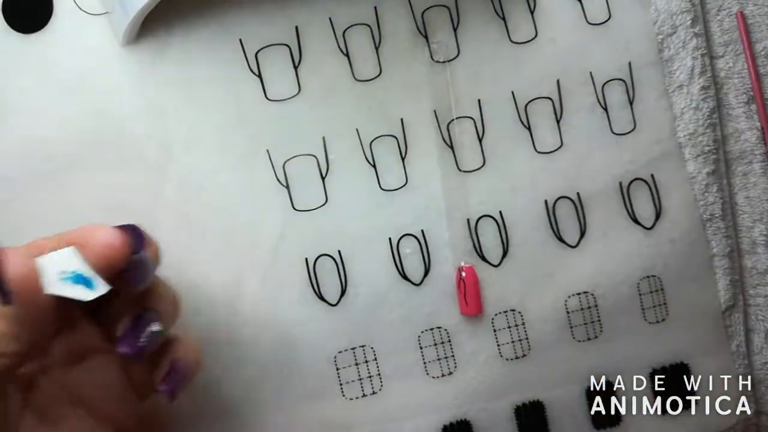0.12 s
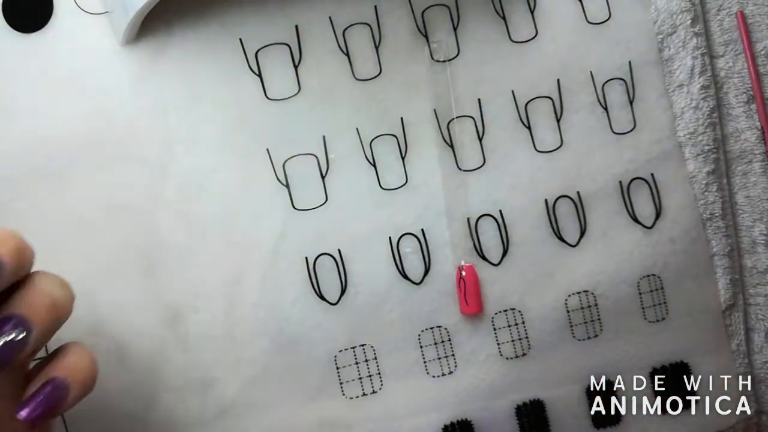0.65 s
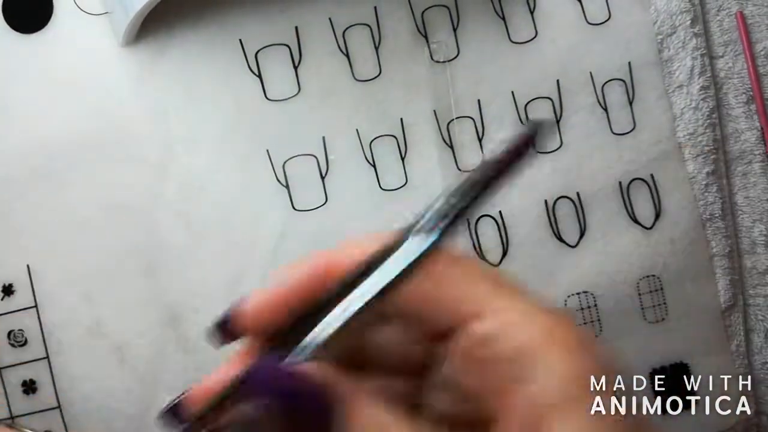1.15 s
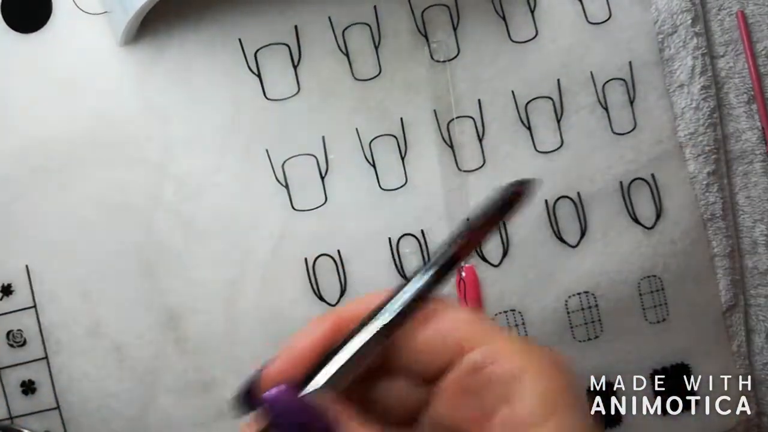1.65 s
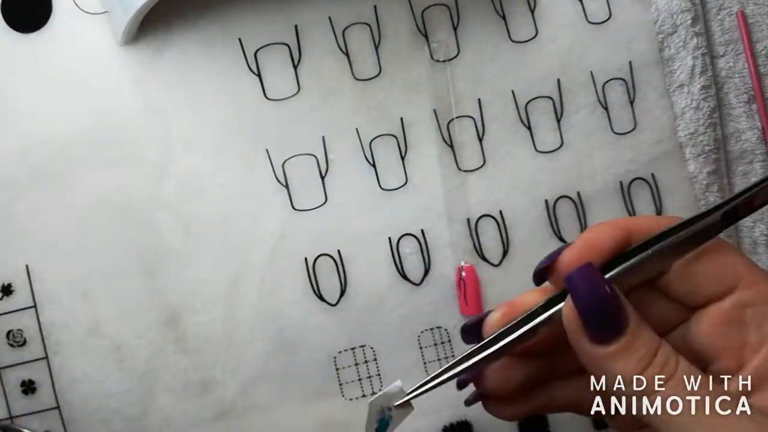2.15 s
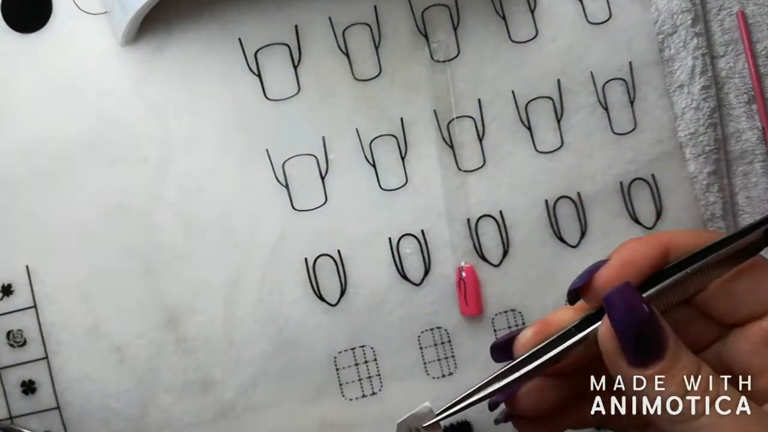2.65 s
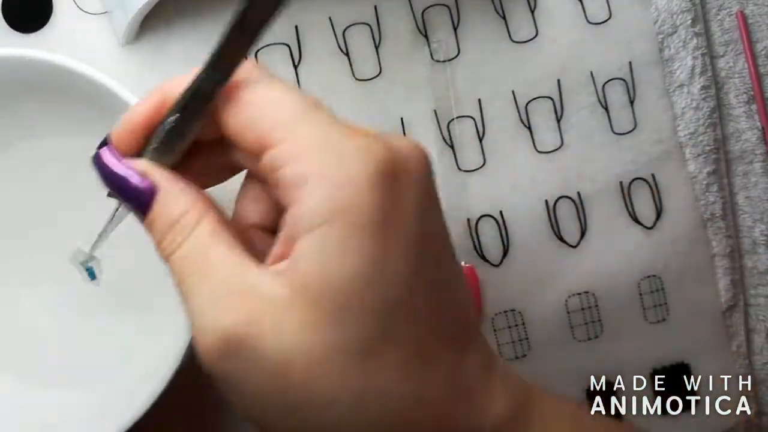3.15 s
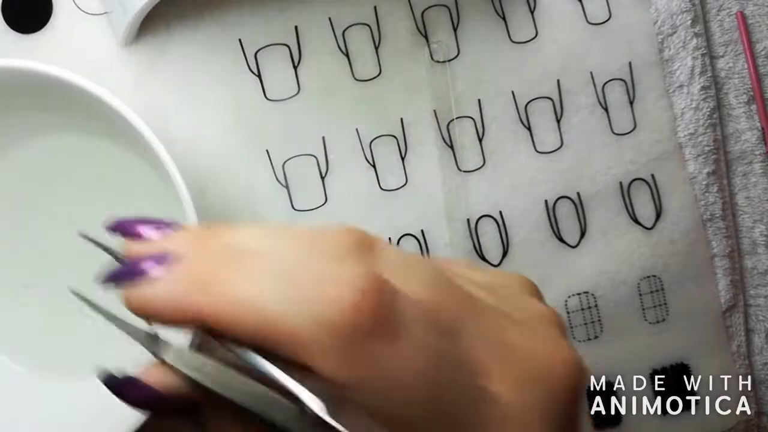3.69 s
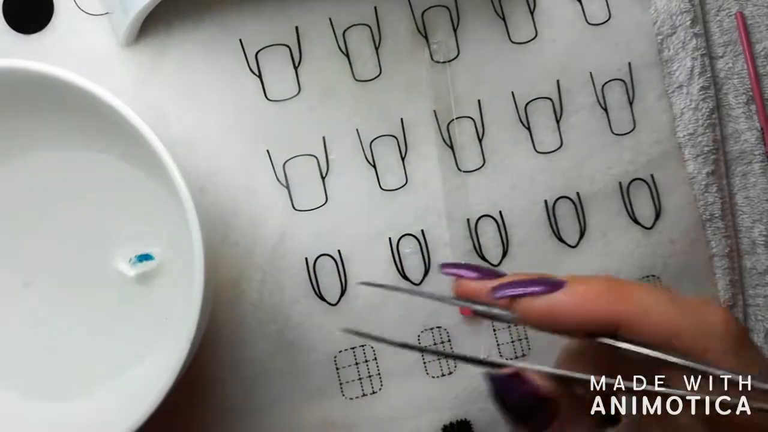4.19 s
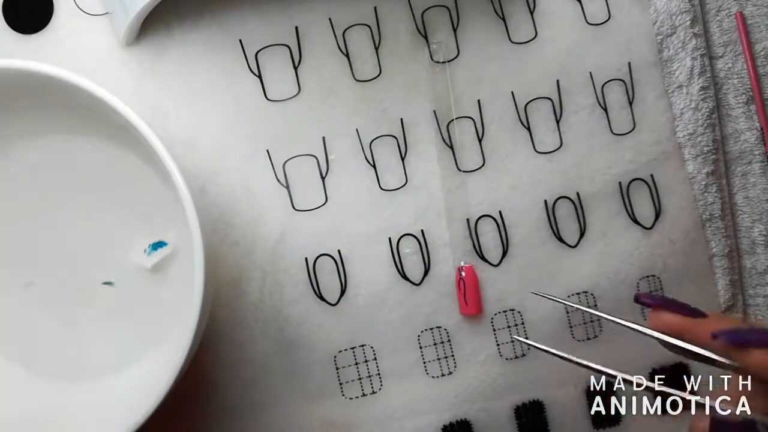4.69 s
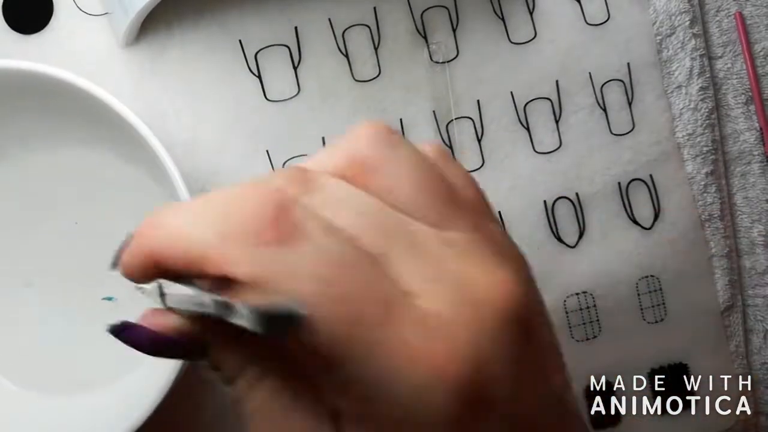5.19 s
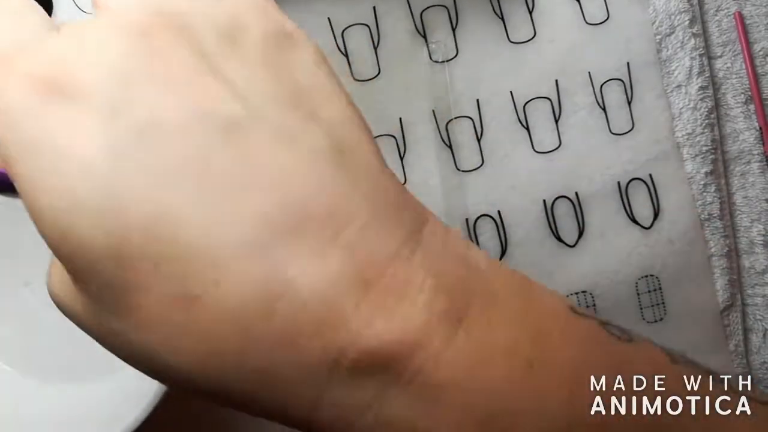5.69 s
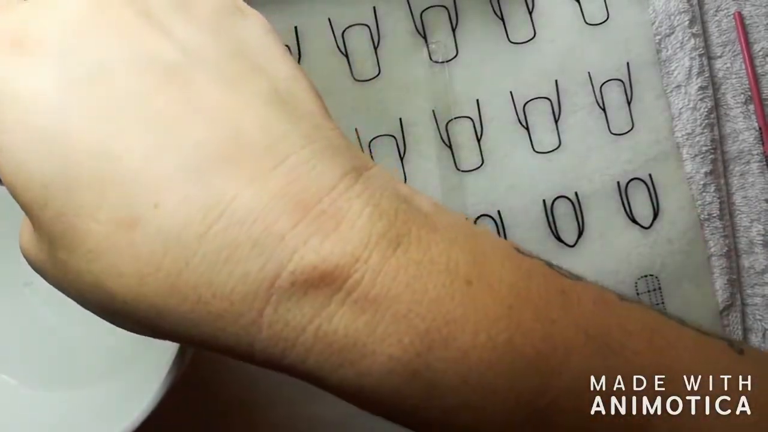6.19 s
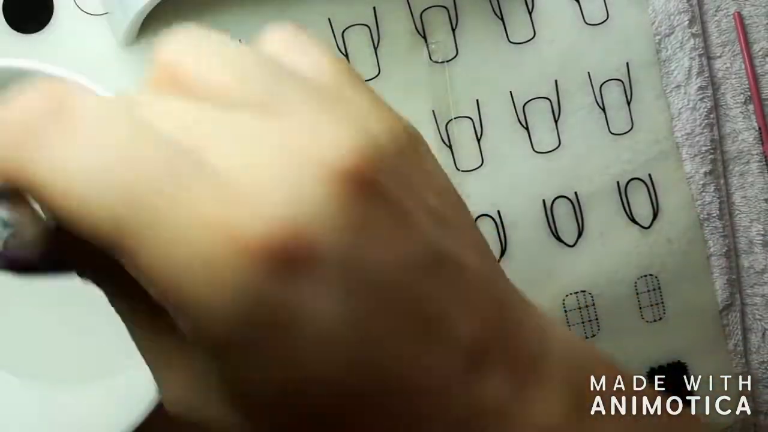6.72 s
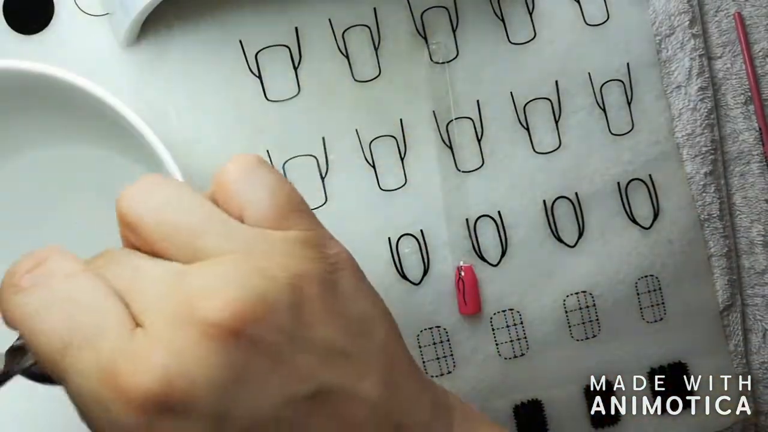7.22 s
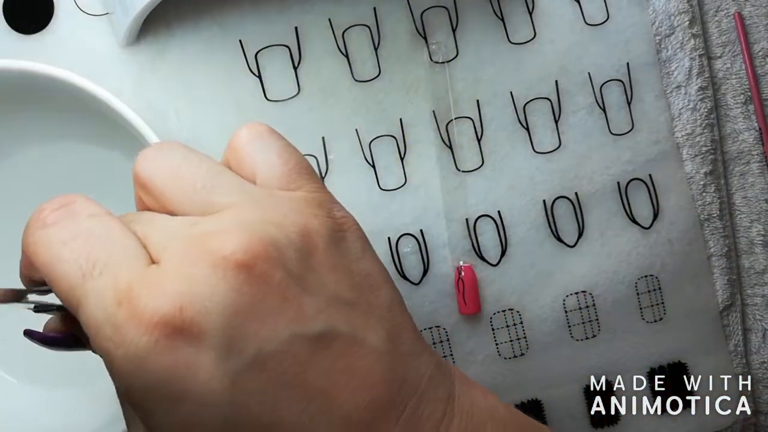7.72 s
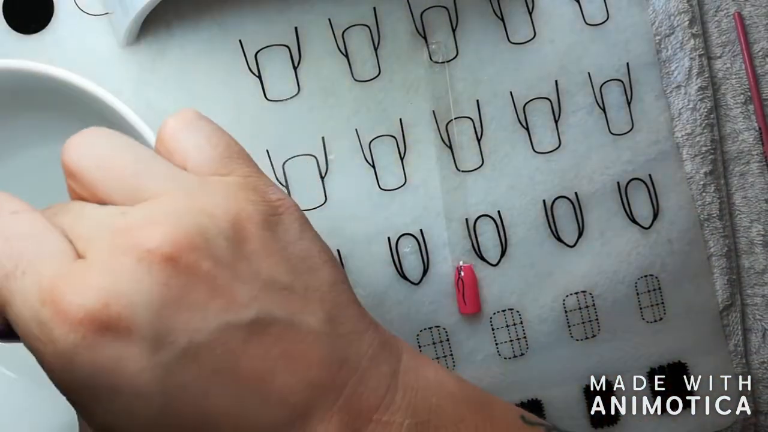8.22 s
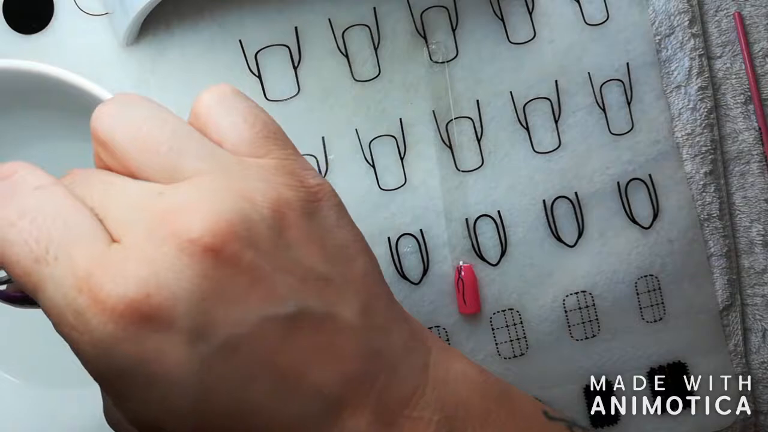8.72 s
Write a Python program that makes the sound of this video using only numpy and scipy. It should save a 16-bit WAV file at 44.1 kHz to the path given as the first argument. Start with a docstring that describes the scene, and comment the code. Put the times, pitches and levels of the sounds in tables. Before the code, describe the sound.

Close at a quiet desk, soft hand rubbing and humming room tone, a sharp steel click midway, later a muffled double-bump knock and light taps.

```python
"""Steel tweezers snap shut once and a knuckle knocks a bowl on a desk, heard from close by.
Each blow is a short push plus a noise rattle, ringing decaying sine modes; a short noise tail follows.
Hands and sleeves rustle faintly: coloured, uneven noise strokes.
Behind: mains hum, a thin electronic whine and a far motor (sines), and room noise (shaped spectra)."""
import sys
import numpy as np
from scipy import signal
from scipy.fft import rfft, irfft
from scipy.io import wavfile
from scipy.ndimage import uniform_filter1d

SR = 44100
rng = np.random.default_rng(int(sys.argv[2]) if len(sys.argv) > 2 else 0)


def amplitude_ratio(level_db):
    """Convert a level in decibels to the matching linear amplitude (field) ratio."""
    exponent = np.asarray(level_db, float) / 20
    return 10 ** exponent


def waveform_to_disk(signal):
    """Save audio, clipped to [-1, 1], as 16-bit WAV at the path in sys.argv[1]."""
    frames = np.transpose(np.atleast_2d(signal))
    scaled = np.clip(frames, -1, 1) * 32767
    samples = np.round(scaled).astype(np.int16)
    wavfile.write(sys.argv[1], SR, samples)


N = 390726

# tweezer modes: (frequency [Hz], relative level [dB], t60 [s])
STEEL_MODES = [(2090, -16, 0.013), (2330, -17, 0.014), (2640, -17, 0.01), (2780, -4, 0.016),
               (2822, -10, 0.036), (3740, -23, 0.011), (4120, -15, 0.014), (4660, -15, .015),
               (4880, -4, 0.012), (5250, -1.5, .018), (5960, -6.5, 0.02), (6440, -4, 0.019),
               (4700, -1.5, .003), (6000, 6.5, 0.0037), (8700, 0, 0.0085), (11270, -1, .003),
               (14000, 1.5, .002)]
# tips touch, snap and bounce: (time [s], push peak [dB], push time scale [ms], chatter [dB rms], chatter length [s])
SNAP_HITS = [(4.9306, -16.5, .012, -28.5, 0.011), (4.9364, -7, 0.03, -29, 0.011),
             (4.9373, -1, 0.032, -44.5, .002), (4.9435, -18.5, .03, -44.5, 0.0024),
             (4.948, -17.5, .03, -38.5, 0.0017)]
RING_CUT_S = 4.9522  # the ring drops away abruptly here
# bowl and desk-top modes: (frequency [Hz], relative level [dB], t60 [s])
BOWL_MODES = [(320, -9.5, 0.069), (393, 4, 0.024), (502, -4.5, .025), (694, 2.5, 0.024), (910, -7, 0.033),
              (1050, -1.5, 0.025), (1250, 4, 0.017), (1600, -12.5, 0.079), (1835, -9, 0.028),
              (3440, -12.5, 0.027)]
# knocks and taps: (time [s], push peak [dB], push time scale [ms], chatter [dB rms], chatter length [s])
KNOCK_HITS = [(4.385, -37.5, 0.047, -42, 0.0032), (6.432, -30, 0.22, -31, 0.025),
              (6.4418, -19, 0.33, -25.5, 0.01055), (6.449, -16.5, 0.11, -35.5, 0.02),
              (6.4535, -23, 0.41, -56, 0.0036), (8.071, -37, 0.13, -56, .01),
              (8.413, -43, 0.066, -53, 0.012), (8.717, -37.5, .08, -55, .01)]
# skin and cloth strokes: (time [s], length [s], level before envelope [dB rms], centre [Hz], half-width [octaves])
RUB_STROKES = [(0, 0.5, -53.5, 1260, 1.63), (0.097, 0.32, -61.5, 2800, 0.55),
               (0.219, 0.21, -54, 3270, 0.33), (.222, .06, -48, 1300, 1.7),
               (0.267, 0.29, -57.5, 1430, 0.53), (.485, 0.015, -55.5, 3200, .43),
               (0.516, 0.04, -49.5, 2380, 1.2), (0.555, 0.039, -51.5, 2040, 1.3),
               (0.853, 0.066, -56.5, 2600, 1), (0.953, .026, -58.5, 3180, 0.44),
               (1.006, 0.027, -61, 3240, .6), (1.074, .025, -61.5, 3300, 0.67),
               (2.828, .025, -64.5, 3470, .74), (3.743, 0.19, -62.5, 2730, 0.53),
               (4.195, 0.056, -66.5, 6000, .25), (4.264, 0.025, -60.5, 6600, 0.24),
               (5.252, 0.1, -68, 6000, 0.66), (5.799, 0.6, -60.5, 2000, 1.43),
               (6.195, 0.019, -55, 2400, 1.1), (6.271, 0.049, -63.5, 4040, 0.59),
               (6.822, 0.037, -63, 4100, 0.38), (7.829, 0.02, -62, 4700, .5), (8.044, 0.1, -55, 1980, 1.36),
               (8.07, 0.016, -49, 1050, 0.93), (8.101, 0.054, -44, 1050, 1.37),
               (8.413, 0.029, -44.5, 1050, 1.6), (8.452, .075, -59.5, 2020, 1.4),
               (8.714, 0.098, -49, 1410, 1.31), (8.801, 0.011, -46.5, 1080, 1.5),
               (8.84, .015, -47, 1200, 1.65)]
# resonances of the rubbed things: (frequency [Hz], width [Hz], gain [dB])
DESK_RESONANCES = [(1020, 230, 10), (1354, 66, 10), (3387, 510, 0)]
RISE_SHARE, SAG_DB, RELEASE_DB_PER_S = 0.07, -3.5, 341  # stroke envelope; rise is a share of the length
MAINS_HZ = 50.042
# hum harmonics: (multiple of mains [1], level [dB rms])
HUM_HARMONICS = [(4, -85.5), (5, -56.5), (6, -45.5), (7, -51), (9, -77.5), (10, -70), (11, -64),
                 (12, -65.5), (13, -70), (14, -86.5)]
# casing resonances that set the hum phases: (frequency [Hz], width [Hz])
CASING_RESONANCES = [(330, 30), (575, 34)]
# brief hum sags: (middle [s], length [s], level change [dB])
HUM_SAGS = [(.22, .25, -1), (2.414, .32, -3.5), (3.303, .14, -4), (4.05, .2, -0.5), (5.653, .22, -2),
            (7.396, .25, -3), (8.68, .15, -2)]
WAVER_DB_RMS, WAVER_S = 0.5, 0.076  # constant hum waver: depth, smoothing time
WHINE_HZ = 1002.67
# whine tones: (multiple of WHINE_HZ [1], level [dB rms])
WHINE_TONES = [(3, -77.5), (4, -88.5), (6, -81), (7, -85.5)]
# motor wind-ups: (start [s], end [s], from [Hz], to [Hz], level before fades [dB rms])
MOTOR_WINDUPS = [(1.75, 2.566, 415, 498, -65.5), (4.3, 4.968, 430, 492, -67), (6.7, 7.08, 445, 488, -63)]
# room noise colour: (frequency [Hz], relative density [dB per Hz])
ROOM_COLOUR = [(30, -34.5), (80, -36.5), (105, -23), (150, 1.5), (230, 1.5), (350, 0), (550, -6),
               (1050, -5), (1500, -9.5), (3000, -18.5), (3500, -23), (4700, -27), (6200, -26),
               (7200, -36.5)]
ROOM_DB_RMS = -53
EDGE_HZ = 7534  # upper band limit; little is heard above


def evened(x):
    """Scales to rms 1."""
    return x / np.sqrt(np.mean(x ** 2) + 1e-20)


def add(mix, time_s, sound):
    """Mixes a sound in at a time, cut at the end of the mix."""
    part = mix[round(max(time_s, 0) * SR):][:len(sound)]
    part += sound[:len(part)]


def struck(hits, modes, rattle_ms, lowest_hz):
    """A Gaussian contact push, plus a rattle of tiny contacts from the same instant; both ring the modes."""
    out = np.zeros(N)
    t = np.arange(SR // 10) / SR
    hz, db, t60_s = np.transpose(modes)[:, :, None]
    ring = (amplitude_ratio(db - 60 * t / t60_s) * np.sin(2 * np.pi * hz * t)).sum(0)
    # small things send out no bass
    ring = signal.sosfilt(signal.butter(7, lowest_hz, "high", fs=SR, output="sos"), ring)

    def pushed(scale_ms):
        push = np.exp(-(t * 1000 / scale_ms - 2) ** 2)
        return signal.fftconvolve(push, ring)[:len(t)]

    soft = pushed(rattle_ms)
    for time_s, peak_db, contact_ms, chatter_db, chatter_s in hits:
        blow = pushed(contact_ms)
        add(out, time_s, amplitude_ratio(peak_db) * blow / abs(blow).max())
        rattle = rng.standard_normal(len(t)) * (t < chatter_s)
        chatter = signal.fftconvolve(rattle, soft)[:len(t)]
        add(out, time_s, amplitude_ratio(chatter_db) * chatter / np.linalg.norm(soft))
    return out


def tweezers():
    """Bright steel modes, cut short."""
    steel = struck(SNAP_HITS, STEEL_MODES, rattle_ms=0.035, lowest_hz=2220)
    cut_db = np.clip(8000 * (np.arange(N) / SR - RING_CUT_S), 0, 14)  # 8000 dB/s down to -14 dB
    return steel * amplitude_ratio(-cut_db)


def knocks():
    """Dull low modes of bowl and desk."""
    return struck(KNOCK_HITS, BOWL_MODES, rattle_ms=0.11, lowest_hz=255)


def rustles():
    """Uneven tiny slips, coloured by a broad bump and the desk; each stroke swells, sags and stops."""
    out = np.zeros(N)
    t = np.arange(SR * 3 // 4) / SR
    hz = np.fft.rfftfreq(len(t), 1 / SR) + 1
    desk = amplitude_ratio(sum(db / (1 + (2 * (hz - f) / width) ** 2) for f, width, db in DESK_RESONANCES))
    for time_s, length_s, db, centre_hz, octaves in RUB_STROKES:
        noise = rng.standard_normal(len(t))
        unevenness = evened(uniform_filter1d(rng.standard_normal(len(t)), size=90))
        slips = noise * amplitude_ratio(2.4 * unevenness)
        bump = np.exp(-(np.log2(hz / centre_hz) / octaves) ** 2)
        grain = evened(irfft(rfft(slips) * bump * desk, len(t)))
        rise = np.minimum(t / (RISE_SHARE * length_s), 1)
        fall_db = SAG_DB * t / length_s - RELEASE_DB_PER_S * np.maximum(t - length_s, 0)
        add(out, time_s, amplitude_ratio(db) * grain * rise * amplitude_ratio(fall_db))
    return out


def hum():
    """Mains-locked harmonics, each lagging as the casing resonances dictate; the level wavers and sags."""
    t = np.arange(N) / SR
    waver = evened(uniform_filter1d(rng.standard_normal(N), round(WAVER_S * SR)))
    sags_db = sum(db * np.exp(-(2 * (t - middle_s) / length_s) ** 2) for middle_s, length_s, db in HUM_SAGS)
    level_db = WAVER_DB_RMS * waver + sags_db
    turns = MAINS_HZ * t + rng.random()
    tones = np.zeros(N)
    for k, db in HUM_HARMONICS:
        lag = sum(np.arctan2(2 * (k * MAINS_HZ - f), width) for f, width in CASING_RESONANCES)
        tones += amplitude_ratio(db) * np.cos(2 * np.pi * k * turns - lag)
    return np.sqrt(2) * tones * amplitude_ratio(level_db - level_db.mean())


def whine():
    """Thin steady sines from the electronics, random in phase."""
    t = np.arange(N) / SR
    tones = np.zeros(N)
    for k, db in WHINE_TONES:
        tones += amplitude_ratio(db) * np.sin(2 * np.pi * (k * WHINE_HZ * t + rng.random()))
    return np.sqrt(2) * tones


def motor():
    """A faint sine that slides up as the motor winds up, fading in and out."""
    out = np.zeros(N)
    for start_s, end_s, from_hz, to_hz, db in MOTOR_WINDUPS:
        hz = np.linspace(from_hz, to_hz, round((end_s - start_s) * SR))
        fade = signal.windows.tukey(len(hz), 0.6)
        tone = np.sin(2 * np.pi * np.cumsum(hz) / SR)
        add(out, start_s, np.sqrt(2) * amplitude_ratio(db) * fade * tone)
    return out


def room():
    """Random short-time spectra with drifting patches and a slow swell, then coloured."""
    frames = N // 256 + 5
    real, imag, patches = rng.standard_normal((frames, 513, 3)).T
    patches = uniform_filter1d(patches, size=20, axis=0)  # over frequency
    patches = evened(uniform_filter1d(patches, size=16, axis=1))  # over time
    swell = evened(uniform_filter1d(rng.standard_normal(frames), size=30))
    spectra = (real + 1j * imag) * amplitude_ratio(1.4 * patches + 0.29 * swell)  # dB rms depths
    noise = signal.istft(spectra, nperseg=1024, noverlap=768)[1][:N]
    f, db = np.transpose(ROOM_COLOUR)
    colour = amplitude_ratio(np.interp(np.log(np.fft.rfftfreq(N, 1 / SR) + 1), np.log(f), db))
    return amplitude_ratio(ROOM_DB_RMS) * evened(irfft(rfft(noise) * colour, N))


def room_tail(blows):
    """Reflections of the blows: a decaying noise response, t60 0.12 s, silent for its first 4 ms."""
    t = np.arange(SR // 4) / SR
    tail = rng.standard_normal(len(t)) * amplitude_ratio(-60 * t / 0.12) * (t > 0.004)
    return amplitude_ratio(-25.5) * signal.fftconvolve(blows, tail / np.linalg.norm(tail))[:N]


def scene():
    """Everything at the desk, with a short room tail on the blows."""
    blows = tweezers() + knocks()
    blows = blows + room_tail(blows)
    return (blows + rustles() + hum() + whine() + motor() + room())[None]


def roll_off(x):
    """The treble ends steeply here."""
    return signal.sosfilt(signal.butter(12, 15700, fs=SR, output="sos"), x)


def record(dry):
    """Gain control ducks the sound after a loud blow; band limit with a little leak; noise grows with loudness."""
    power_db = 10 * np.log10(abs(uniform_filter1d(dry[0] ** 2, size=440)) + 1e-12)
    fall_db = np.arange(N) * 27.0 / SR  # the held peak falls 27 dB/s
    held_db = np.maximum.accumulate(power_db + fall_db) - fall_db
    over_db = np.maximum(held_db + 30.0, 0)  # threshold -30 dB
    late_db = signal.lfilter([0.002], [1, -0.998], over_db)  # lags by about 11 ms
    ducked = dry / amplitude_ratio(0.27 * late_db)

    band_limit = signal.firwin(601, EDGE_HZ, window=("kaiser", 9), fs=SR)
    narrow = signal.oaconvolve(ducked, band_limit[None], "same")
    leak = amplitude_ratio(-25.5) * (ducked - narrow)

    hiss = amplitude_ratio(-101.5) * rng.standard_normal(dry.shape)
    low = signal.sosfilt(signal.butter(2, 1500, fs=SR, output="sos"), narrow)
    # only blows raise the noise
    loud_share = np.clip(900 * uniform_filter1d(narrow ** 2, size=300, axis=1) - 0.3, 0, 1)
    hiss = hiss * (1 + amplitude_ratio(33.5) * loud_share)
    thump = 0.3 * loud_share * low ** 2  # squaring adds a faint thump to loud low blows
    return roll_off(narrow + thump + leak + hiss)


dry = scene()
out = record(dry)
waveform_to_disk(out)
```